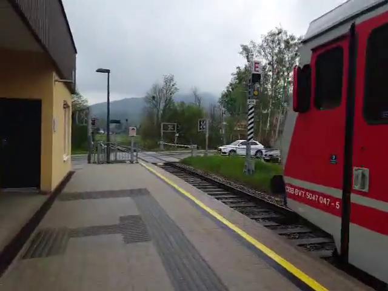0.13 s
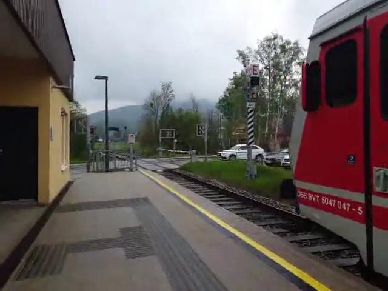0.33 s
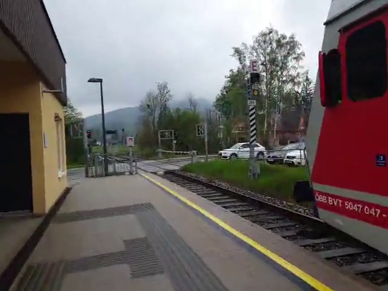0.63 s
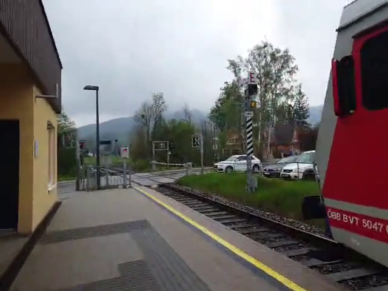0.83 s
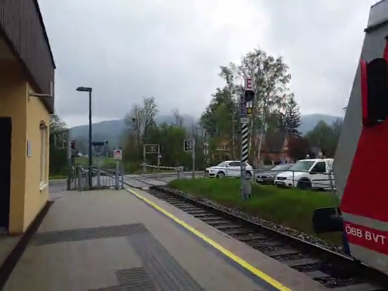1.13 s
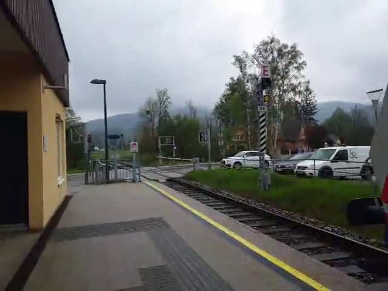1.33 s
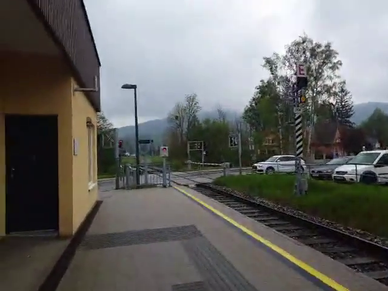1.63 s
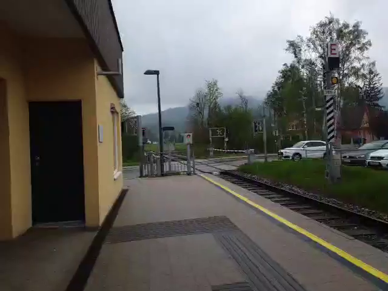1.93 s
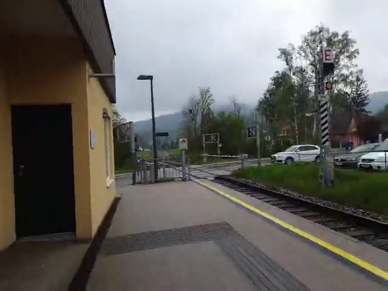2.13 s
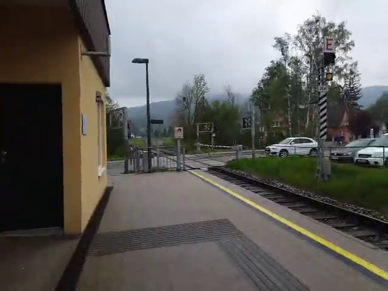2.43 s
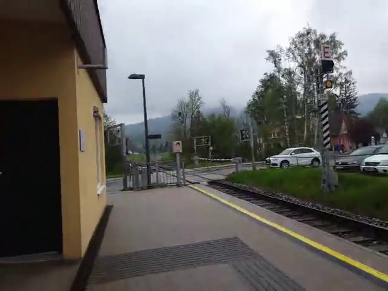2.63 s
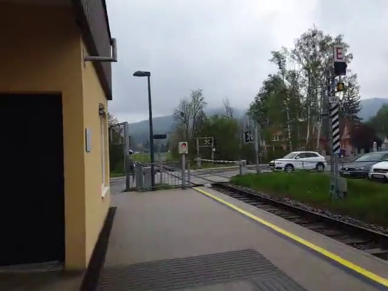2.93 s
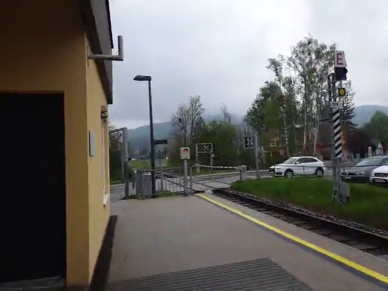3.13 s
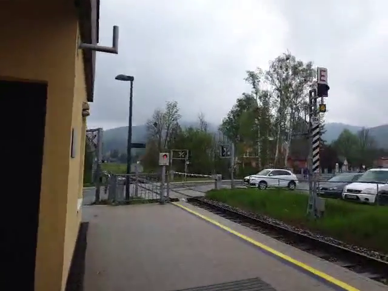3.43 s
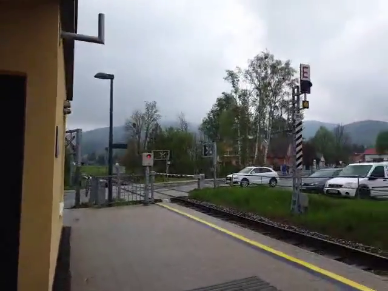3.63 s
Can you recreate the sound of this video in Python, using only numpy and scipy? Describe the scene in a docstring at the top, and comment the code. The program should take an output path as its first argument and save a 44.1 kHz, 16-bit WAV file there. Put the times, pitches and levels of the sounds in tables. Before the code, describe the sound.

A diesel railcar idles steadily with a low, slowly beating hum. Almost at once a door slams with a rattling clatter, air hisses out and fades, and the idling continues on an open platform, heard by a handheld stereo microphone.

```python
"""A six-cylinder diesel railcar idles at a small platform, heard by a hand-held stereo camera.
From the start, orders of the engine cycle, shaft tones, whine and a beating hum sit in noise roar and clatter.
A tick comes first; at 0.27 s a valve whistles as two beating tones, and from 0.34 s a door slams in
twelve blows of panel modes, frame noise and cracks, with noise-tail echoes. Air starts to hiss during
the slam and sinks in pitch; a squeak rises at 0.67 s, and late ticks and rustles are noise bursts."""
import sys
import numpy as np
from scipy import signal
from scipy.fft import rfft, irfft
from scipy.io import wavfile
from scipy.ndimage import uniform_filter1d

SR = 44100
rng = np.random.default_rng(int(sys.argv[2]) if len(sys.argv) > 2 else 0)


def materialize(psi):
    """Save the field psi as 16-bit PCM at rate SR to the path in sys.argv[1].

    A 1-D psi becomes a single channel; in a 2-D psi each row is a channel.
    """
    bounded = np.clip(np.atleast_2d(psi).T, -1, 1)
    quanta = np.round(bounded * 32767).astype(np.int16)
    wavfile.write(sys.argv[1], SR, quanta)


N = 167580

# Engine tones: (multiple of the cycle rate), (level [dB])
ENGINE_ORDERS = [6, 11, 13, 18, 24, 30, 31, 42, 48, 54, 60, 66, 69, 78]
ENGINE_ORDER_DB = [-36, -49, -45.5, -49, -50, -46, -51, -51, -49, -54, -51.5, -53.5, -43.5, -59]
# Auxiliary shaft tones: (multiple of the shaft rate), (level [dB])
SHAFT_ORDERS = [5, 28]
SHAFT_ORDER_DB = [-55, -49.5]
# Whine tones: (frequency [Hz]), (level [dB])
WHINE_HZ = [194.9, 183.7, 544.8]
WHINE_DB = [-45.5, -53.5, -62.5]
# Engine balance as the camera turns: (time [s], hum [dB], roar [dB], clatter [dB])
CAMERA_TURN = [(0, -4, 4, 6), (.4, 4.5, 6, 6.5), (.9, -5.5, 0, 3.5), (1.5, -0.5, 0, 3),
               (2.1, -2.5, 1.5, 0.5), (2.8, -1, 0, 0.5), (3.2, 3, 4, 3.5), (3.5, 2, 2.5, 3.5),
               (3.8, 1.5, 4.5, 4.5)]
# Spectral shape of the roar: (frequency [Hz], relative density [dB per Hz])
ROAR_SHAPE = [(18, -16), (40, -17), (68, -7), (95, -16), (140, -7.5), (200, -7), (240, -12.5), (400, -10),
              (630, -15), (850, -23), (1300, -24.5), (2500, -65)]
# Spectral shape of the clatter: (frequency [Hz], relative density [dB per Hz])
CLATTER_SHAPE = [(800, -3), (1300, -4), (1900, -4), (2400, -9.5), (5800, -14.5), (7000, -16.5),
                 (8700, -27.5), (10500, -25), (15700, -26.5)]
# Likeness of the engine noise at the two microphone ports: (frequency [Hz], likeness [0..1])
PORT_LIKENESS = [(60, 1), (150, 0.69), (300, 0.92), (640, 0.43), (1400, 0.64), (3000, 0.05), (15000, 0.022)]
# Port balance, the housing shading the left port: (frequency [Hz], left minus right [dB])
PORT_SHADING = [(60, 2.0), (240, 2.0), (950, 0.5), (3770, -1.5), (15000, -9.5)]
# Escaping air: (time [s], level [dB], centre [Hz])
AIR_HISS = [(.42, -84, 13500), (.52, -43, 13500), (.95, -42, 12900), (1.3, -43.5, 12150), (1.9, -50, 11600),
            (2.3, -56, 11300)]
# Valve whistle: (time [s], level [dB])
VALVE_WHISTLE = [(.265, -59), (.282, -39), (.348, -42), (.367, -52), (.41, -56)]
# Faint rising squeak: (time [s], frequency [Hz], level [dB])
SQUEAK_GLIDE = [(.67, 1950, -56), (.69, 2000, -53), (.745, 2380, -48), (.775, 2400, -69)]
# Small ticks and rustles: (time [s], level [dB], centre [Hz], spread [octaves], t60 [s])
TICKS = [(0.194, -36, 6340, 0.13, 0.018), (0.366, -29, 2940, 0.13, 0.044), (0.741, -42, 5500, 0.65, 0.028),
         (2.089, -45, 2470, 1.3, 0.12), (3.203, -43, 7500, 0.79, 0.024), (3.211, -48, 10500, .3, 0.03),
         (3.223, -50, 13500, 0.43, 0.3), (3.255, -45.5, 5700, 0.35, 0.22), (3.276, -40, 8500, 1.3, 0.024)]
# Decay of the echo from wall and car side: (frequency [Hz], t60 [s])
ECHO_DECAY = [(100, 0.29), (1000, 0.24), (4000, 0.5), (12000, 0.25)]
# Door blows: (time [s], thud [dB], knock [dB], crack [dB], crack brightness [dB per octave])
DOOR_BLOWS = [(0.34, -16, -25, -60, 3), (0.357, -45, -55, -18, 0.5), (.364, -15.5, -24.5, -36, 6),
              (.400, -14, -15.5, -23.5, -1), (.405, -12, -17.5, -10.5, -1.5),
              (.423, -11.5, -13.5, -11, -0.5), (0.429, -15, -18.5, -8.5, 1), (0.465, -15, -17, -31, .1),
              (0.482, -15, -40, -26, -13), (.502, -30, -14.5, -26, 2), (0.548, -30.5, -34, -50, -2),
              (.567, -18.5, -52, -52, 3)]
# Thud modes before each blow lowers their pitch: (nominal frequency [Hz], level [dB], t60 [s])
PANEL_MODES = [(73.4, -14, 0.14), (104, -20, 0.12), (149.4, -1.5, 0.085), (207.6, -0.5, 0.1),
               (347, -10.5, 0.07)]
# Spectral shape of a crack: (frequency [Hz], relative density [dB per Hz])
CRACK_SHAPE = [(710, -34), (1200, -2.5), (3000, -1), (4400, -6.5), (5400, -1.5), (9000, -13), (9900, -3),
               (11400, -10), (12600, -3.5), (15800, -13)]

CYCLE_HZ, CYCLE_WANDER = 5.82, 0.0019  # one four-stroke cycle, six firings in each; rms fraction
SHAFT_HZ = 22.55
ROAR_DB, CLATTER_DB = -35, -45
HUM_HZ, BEAT_HZ, BEAT_TOP_S = 148.8, 1.17, 2.47  # lower tone, spacing, a moment when both align
HUM_DB, PARTNER_DB = -31, -4.5  # partner relative to the lower tone
WAVER_DB, WAVER_S = 1.5, 0.15  # rms waver, smoothing time
PORT_LAG_S = 0.00037  # engine sound reaches the right port first, about 13 cm of path
AIR_BELOW_HZ, AIR_ABOVE_HZ = 1380, 1100  # widths on either side of the centre
AIR_WIDE_DB, AIR_PAN_DB = -14, -3.5  # broad hiss at 10 kHz; left minus right
WHISTLE_HZ, WHISTLE_PAN_DB = 13510, -5
THROB_HZ, THROB_TOP_S, THROB_DB = 33, 0.287, -3  # spacing, alignment, second tone
SQUEAK_WIDTH_HZ = 60
ECHO_DB, LOW_ECHO_DB = -5.5, -3.5
KNOCK_HZ, KNOCK_SPREAD = 470, 1.31  # centre, octaves
KNOCK_T60_S, KNOCK_RISE_S = 0.069, 0.0017
CRACK_T60_S, CRACK_RISE_S, GRAIN_DB = 0.039, 0.0022, 3
BLOW_SAMPLES = 8192
LEFT_LAG_S = 0.00039  # knocks, ticks and squeak reach the left port later; thuds and cracks are not delayed
EDGE_HZ = 15600


def amp(db):
    """Amplitude factor of a level in dB."""
    return 10 ** (np.asarray(db) / 20)


def evened(x):
    """Scale to rms 1."""
    return x / np.sqrt(np.mean(x ** 2) + 1e-20)


def read(points, hz):
    """Read a spectral table along a logarithmic frequency axis."""
    f, value = np.transpose(points)
    return np.interp(np.log(hz + 1), np.log(f + 1), value)


def curve(table, t):
    """Read every column of a table at times t."""
    rows = np.transpose(table)
    return [np.interp(t, rows[0], column) for column in rows[1:]]


def add(mix, s, sound):
    """Lay a sound into the mix from s seconds, cut at the end."""
    part = mix[round(s * SR):][:len(sound)]
    part += sound[:len(part)]


def pan(x, db):
    """Place a sound by its left-minus-right level."""
    return x * amp([[db / 2], [-db / 2]])


def drift(seconds):
    """Random wander of rms 1, smoothed twice over the given time."""
    size = int(seconds * SR)
    once = uniform_filter1d(rng.standard_normal(N), size)
    return evened(uniform_filter1d(once, size))


def noise(level_db, same, patchy_db, size):
    """Stereo noise from random short-time spectra, shaped by level_db(hz, t)."""
    hop = size // 4
    hz = np.fft.rfftfreq(size, 1 / SR)[:, None]
    t = np.arange(N // hop + 5) * hop / SR
    a, b, c, d, patches = rng.standard_normal((len(t), len(hz), 5)).T
    patches = uniform_filter1d(patches, size // 100, 0)
    patches = evened(uniform_filter1d(patches, 8192 // size + 4, 1))
    same = np.clip(same(hz), -1, 1)
    lead = np.exp(2j * np.pi * hz * PORT_LAG_S)
    left = a + 1j * b
    right = same * lead * left + np.sqrt(1 - same ** 2) * (c + 1j * d)
    z = np.array([left, right]) * amp(level_db(hz, t) + patchy_db * patches)
    return signal.istft(z, nperseg=size, noverlap=size - hop)[1][:, :N] * np.sqrt(2 / size)


def beating_pair(hz, spacing_hz, top_s, partner_db, start_turns):
    """Two close tones, loudest when they align at top_s."""
    t = np.arange(N) / SR
    pair = 1 + amp(partner_db) * np.exp(2j * np.pi * spacing_hz * (t - top_s))
    return (pair * np.exp(2j * np.pi * (hz * t + start_turns))).real


def tones(turns, rate_hz, multiples, levels_db):
    """Wavering sines locked to one rotation, each leading at the right port by the port lag."""
    out = np.zeros((2, N))
    for k, db in zip(multiples, levels_db):
        port_lead = np.array([[0], [2 * np.pi * PORT_LAG_S * k * rate_hz]])
        phase = 2 * np.pi * (k * turns + rng.random()) + port_lead
        out += amp(db + WAVER_DB * drift(WAVER_S)) * np.sqrt(2) * np.sin(phase)
    return out


def engine():
    """The idling railcar: rotation-locked tones, whine and a beating hum over roar and clatter noise."""
    t = np.arange(N) / SR
    hum_db, roar_db, _ = curve(CAMERA_TURN, t)
    cycle = np.cumsum(CYCLE_HZ * (1 + CYCLE_WANDER * drift(0.31))) / SR
    lines = tones(cycle, CYCLE_HZ, ENGINE_ORDERS, ENGINE_ORDER_DB)
    lines += tones(SHAFT_HZ * t, SHAFT_HZ, SHAFT_ORDERS, SHAFT_ORDER_DB)
    lines += tones(t, 1, WHINE_HZ, WHINE_DB)
    pair = beating_pair(HUM_HZ, BEAT_HZ, BEAT_TOP_S, PARTNER_DB, rng.random())
    hum = amp(HUM_DB + hum_db) * pair

    def likeness(hz):
        return read(PORT_LIKENESS, hz)

    def roar_level(hz, s):
        return read(ROAR_SHAPE, hz) + curve(CAMERA_TURN, s)[1]

    def clatter_level(hz, s):
        return read([(300, -81)] + CLATTER_SHAPE, hz) + curve(CAMERA_TURN, s)[2]

    roar = amp(ROAR_DB) * evened(noise(roar_level, likeness, patchy_db=-0.14, size=4096))
    clatter = amp(CLATTER_DB) * evened(noise(clatter_level, likeness, patchy_db=1.38, size=512))
    return lines * amp(0.83 * roar_db) + hum + roar + clatter


def air():
    """Escaping air: a high noise band whose centre sinks as the pressure falls, plus a broad hiss."""
    def level_db(hz, s):
        db, centre = curve(AIR_HISS, s)
        width = np.where(hz < centre, AIR_BELOW_HZ, AIR_ABOVE_HZ)
        peak = np.exp(-((hz - centre) / width) ** 2)
        broad = amp(AIR_WIDE_DB) * (hz / 10000) ** 4
        return db + 20 * np.log10(peak + broad + 1e-5)

    hiss = noise(level_db, np.zeros_like, patchy_db=1.0, size=1024)
    return pan(hiss, AIR_PAN_DB)


def squeak():
    """A narrow gliding tone, fluttering under a slow complex random envelope."""
    t = np.arange(N) / SR
    hz, db = curve(SQUEAK_GLIDE, t)
    flutter = drift(0.5 / SQUEAK_WIDTH_HZ) + 1j * drift(0.5 / SQUEAK_WIDTH_HZ)
    on = (t > SQUEAK_GLIDE[0][0]) & (t < SQUEAK_GLIDE[-1][0])
    return on * amp(db) * (flutter * np.exp(2j * np.pi * np.cumsum(hz) / SR)).real


def valve():
    """A high whistle of fixed pitch, throbbing as its two tones beat."""
    t = np.arange(N) / SR
    on = (t > VALVE_WHISTLE[0][0]) & (t < VALVE_WHISTLE[-1][0])
    level = amp(curve(VALVE_WHISTLE, t)[0] + WAVER_DB * drift(0.01))
    pair = beating_pair(WHISTLE_HZ, THROB_HZ, THROB_TOP_S, THROB_DB, 0)
    return pan(on * level * pair, WHISTLE_PAN_DB)


def burst(gain):
    """Noise of rms 1 filtered by a spectral gain."""
    return evened(irfft(rfft(rng.standard_normal(BLOW_SAMPLES)) * gain))


def band(centre, spread):
    """Noise of rms 1 in a bell-shaped band, its spread in octaves."""
    hz = np.fft.rfftfreq(BLOW_SAMPLES, 1 / SR)
    return burst(np.exp(-(np.log2((hz + 1) / centre) / spread) ** 2))


def ticks():
    """Small ticks and rustles: decaying bursts of band noise."""
    t, out = np.arange(BLOW_SAMPLES) / SR, np.zeros(N)
    for s, db, centre, spread, t60 in TICKS:
        rise = np.minimum(t / t60 * 20, 1)
        add(out, s, amp(db - 60 * t / t60) * rise * band(centre, spread))
    return out


def echo(x):
    """Noise tails from wall and car side, each band dying at its own speed."""
    taps = rng.standard_normal((2, SR)) * (np.arange(SR) > 300)  # gap of about 7 ms
    hz, t, z = signal.stft(taps, SR, nperseg=256)
    decay = amp(-60 * t / read(ECHO_DECAY, hz)[:, None])
    tail = signal.istft(z * decay, SR, nperseg=256)[1]
    return signal.fftconvolve(x[None], tail / np.linalg.norm(tail[0]), axes=1)[:, :N]


def panel_ring(t):
    """Decaying panel modes, each lowered by its own random factor at every blow."""
    out = np.zeros(len(t))
    for hz, db, t60 in PANEL_MODES:
        struck_hz = hz * rng.uniform(0.872, 0.985)
        out += amp(db - 60 * t / t60) * np.sin(2 * np.pi * struck_hz * t)
    return out


def crack(crack_db, bright_db):
    """A decaying bright noise burst, broken into uneven grains."""
    t = np.arange(BLOW_SAMPLES) / SR
    hz = np.fft.rfftfreq(BLOW_SAMPLES, 1 / SR)
    colour = amp(read([(500, -40)] + CRACK_SHAPE, hz) + bright_db * np.log2((hz + 1) / 5000))
    grain_db = GRAIN_DB * evened(uniform_filter1d(rng.standard_normal(len(t)), size=40))
    rise = np.minimum(t / CRACK_RISE_S, 1)
    return rise * amp(crack_db - GRAIN_DB + grain_db - 60 * t / CRACK_T60_S) * burst(colour)


def door():
    """The slam: every blow rings the panel, rattles the frame as dense noise and cracks."""
    t = np.arange(BLOW_SAMPLES) / SR
    thuds, knocks, cracks = np.zeros(N), np.zeros(N), np.zeros((2, N))
    for s, thud_db, knock_db, crack_db, bright_db in DOOR_BLOWS:
        add(thuds, s, amp(thud_db) * panel_ring(t) * np.minimum(t / 0.0016, 1))
        knock = amp(knock_db - 60 * t / KNOCK_T60_S) * band(KNOCK_HZ, KNOCK_SPREAD)
        add(knocks, s, np.minimum(t / KNOCK_RISE_S, 1) * knock)
        for port in cracks:  # each port hears its own mix of the long door edge
            add(port, s, crack(crack_db, bright_db))
    return thuds, knocks, cracks


def scene():
    """Engine and air behind, then the valve and the door with its echoes."""
    thuds, knocks, cracks = door()
    high = knocks + ticks() + squeak()
    direct = np.array([np.roll(high, round(LEFT_LAG_S * SR)), high]) + cracks
    low_echo = amp(LOW_ECHO_DB) * echo(thuds).mean(0)
    high_echo = amp(ECHO_DB) * echo(high + cracks.sum(0) / np.sqrt(2))
    slam = thuds + low_echo + direct + high_echo
    return engine() + air() + slam + valve()


def record(dry):
    """The camera's microphones: port shading, low cut, soft overload, then the band limit."""
    lean = read(PORT_SHADING, np.fft.rfftfreq(N, 1 / SR)) / 2
    shaded = irfft(rfft(dry) * amp([lean, -lean]), N)
    low_cut = signal.butter(2, 21, "high", fs=SR, output="sos")
    soft = np.tanh(signal.sosfilt(low_cut, shaded))
    band_limit = signal.firwin(1023, EDGE_HZ, window=("kaiser", 10), fs=SR)
    return signal.oaconvolve(soft, band_limit[None], "same")


dry = scene()
out = record(dry)
materialize(out)
```